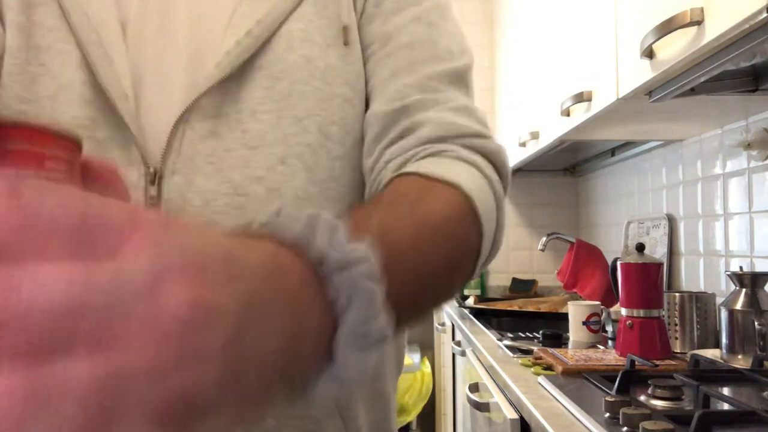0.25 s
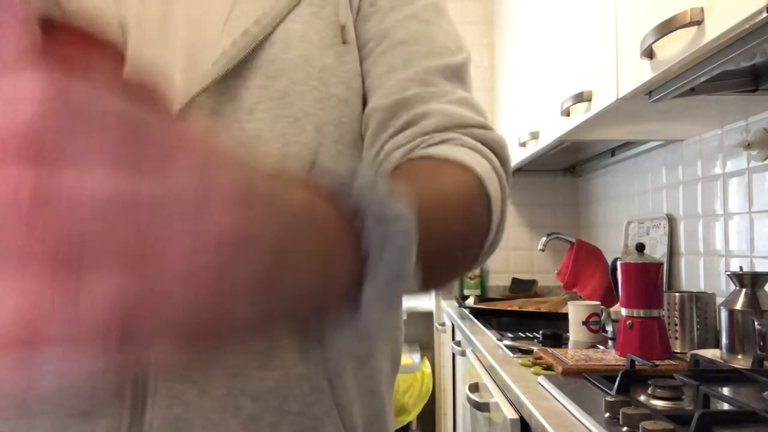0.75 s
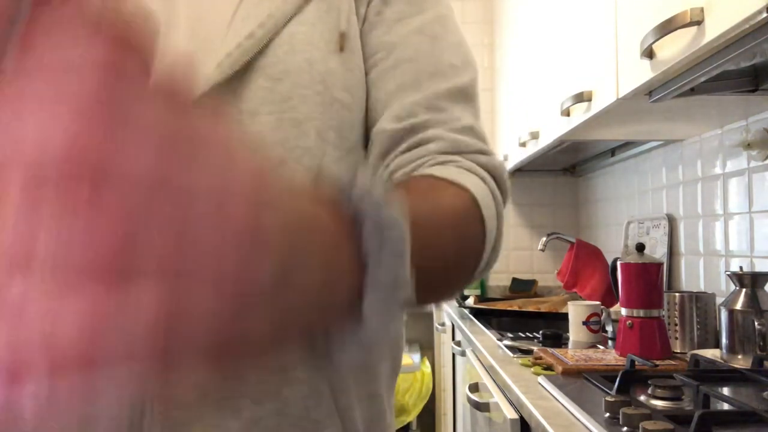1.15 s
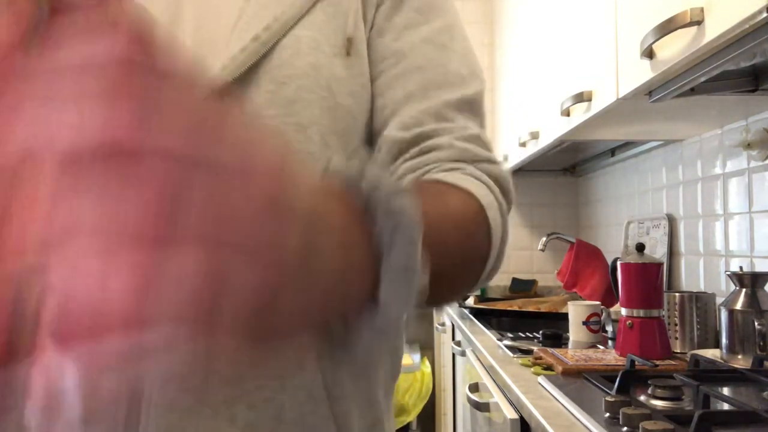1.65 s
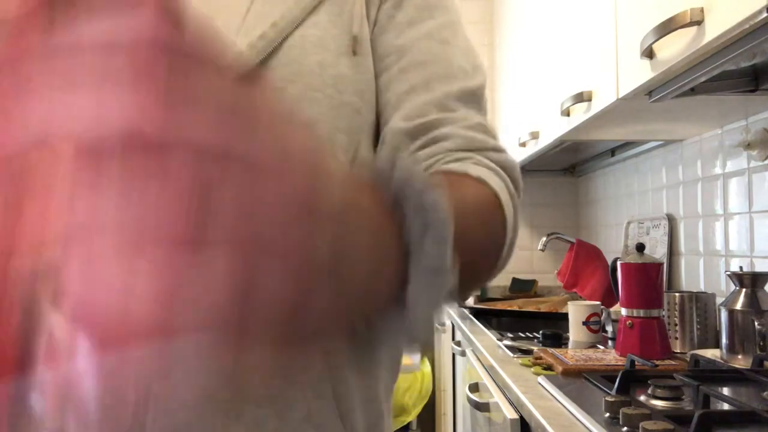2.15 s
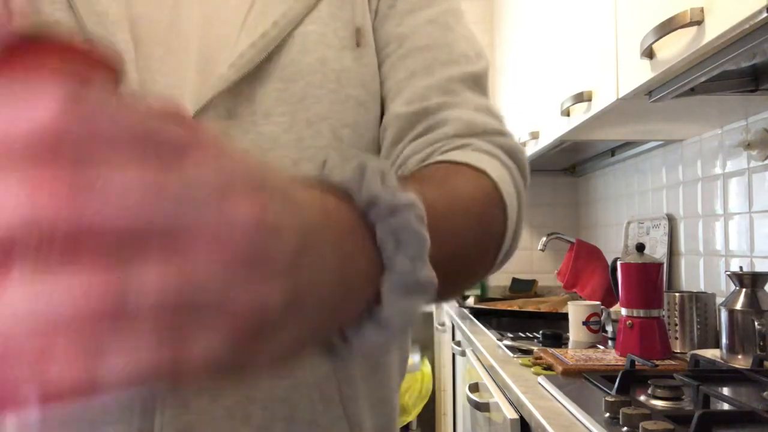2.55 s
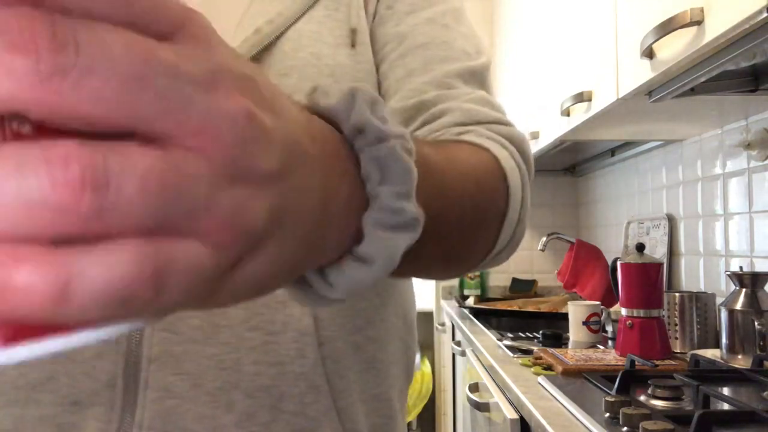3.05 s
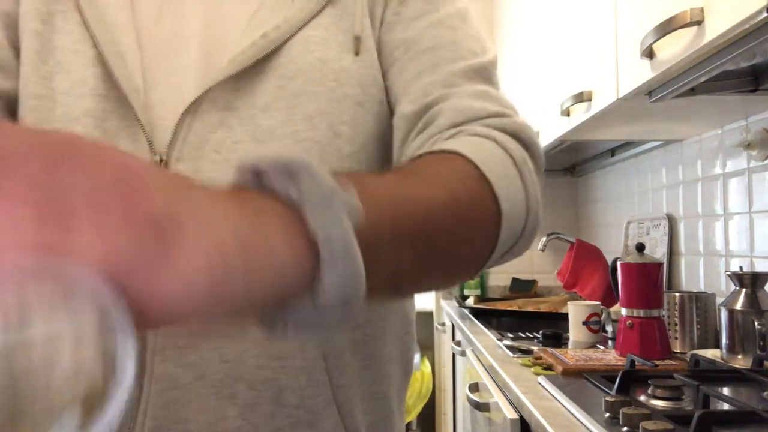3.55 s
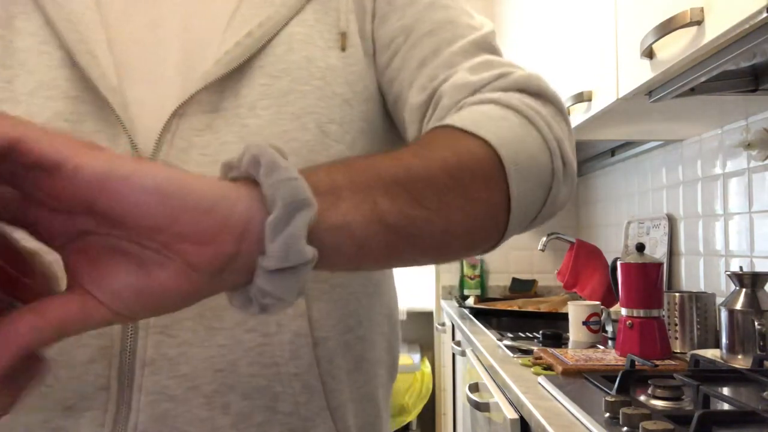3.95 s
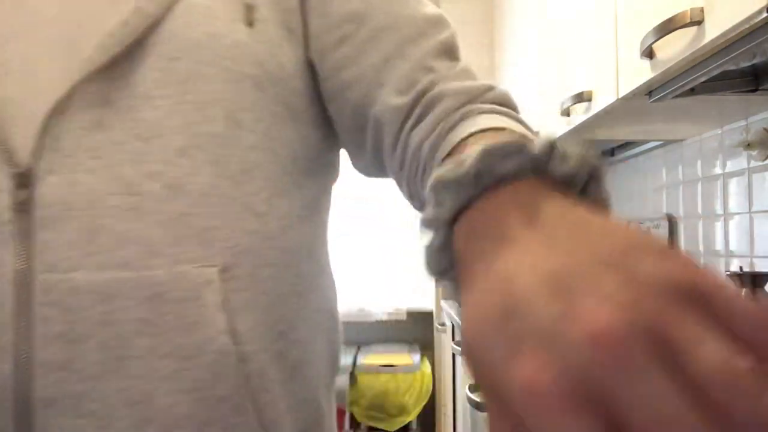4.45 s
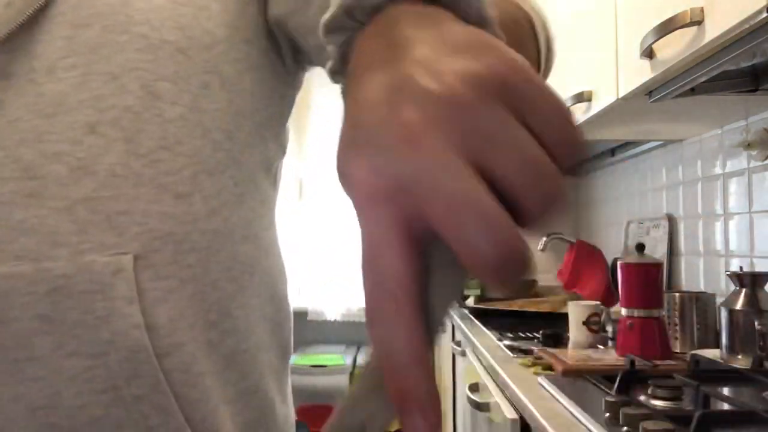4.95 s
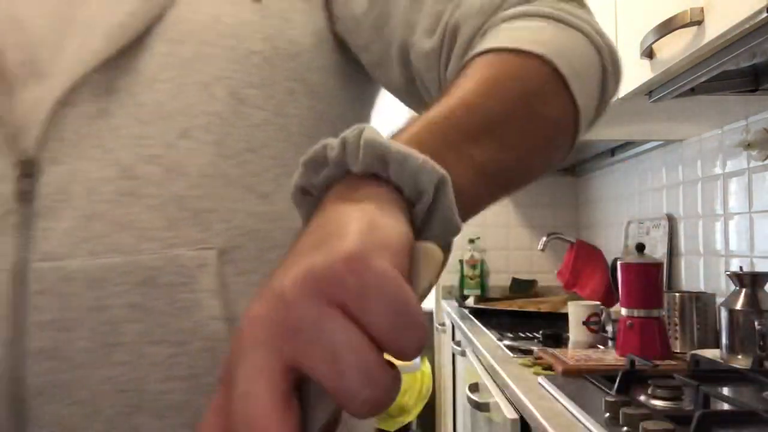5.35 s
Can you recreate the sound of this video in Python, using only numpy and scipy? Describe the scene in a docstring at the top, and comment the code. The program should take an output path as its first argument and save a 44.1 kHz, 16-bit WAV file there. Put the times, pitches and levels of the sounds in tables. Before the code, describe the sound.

Soft powdery shakes about six per second, three loud hollow slaps, a hard counter knock, then faint clicks in a tiled kitchen.

```python
"""Powder thumps and hisses in a shaken canister of grated cheese, which is then slapped three times
and stood on a kitchen counter, where it rocks to rest; small clicks, bumps and rustles follow the hand.
Each landing is a tone of falling pitch, and the sliding powder and cloth are shaped grainy noise.
Solid bodies ring as decaying modes, hard contacts are coloured noise bursts,
and dense reflections add the brief ring of a tiled kitchen over quiet room noise."""
import sys
import numpy as np
from scipy import signal
from scipy.fft import rfft, irfft
from scipy.io import wavfile
from scipy.ndimage import uniform_filter1d

SR = 44100
rng = np.random.default_rng(int(sys.argv[2]) if len(sys.argv) > 2 else 0)


def store_pcm(level_fs):
    """Save levels as 16-bit WAV."""
    pcm = np.round(np.clip(level_fs, -1, 1) * 32767).astype(np.int16)
    wavfile.write(sys.argv[1], SR, np.atleast_2d(pcm).T)


N = 246519
T = np.arange(SR // 2) / SR  # time since the start of one event, s
STROKE_S = .1636  # nominal period of one down-and-up swing of the arm


def strokes():
    """Periodic excitation: evenly spaced landings as (t/s, stroke level/dB, sliding level/dB)."""
    # bouts of even strokes, a lone jolt starting and ending at once:
    # first landing t/s, last landing t/s, sliding hiss level/dB relative to the stroke
    bouts = [(0.0282, .3225, -9), (0.6862, .6868, -15), (.8615, 2.498, -12), (3.3834, 3.3839, -13),
             (3.783, 3.782, -13.5)]
    # vigour of the shaking: t/s, stroke level/dB
    effort = [(0, -43), (.32, -47), (.86, -42.5), (1.5, -42.5), (2.0, -44), (2.17, -41), (2.33, -41),
              (2.5, -46.5), (3.8, -51)]
    rows = []
    for first, last, hiss_db in bouts:
        count = 1 + int(round(abs(last - first) / STROKE_S))
        for s in np.linspace(first, last, count):
            db = np.interp(s, *np.transpose(effort))
            rows.append((s, db, db + hiss_db))
    return rows


def thumps(rise_s=0.00141, overtone=2.592, overtone_db=-3, overtone_t60=0.0435):
    """Relaxing spring: the landed powder bounces on its own stiffness, and softening lowers its pitch."""
    plug_hz, plug_rest_hz, plug_relax_s, plug_length_s = 280, 68, .006, .035
    out = np.zeros(N)
    for s, db, _ in strokes():
        envelope = np.exp(-(T / plug_length_s) ** 4)
        plug = envelope * np.sin(sag(plug_hz, plug_rest_hz, plug_relax_s))
        packing = 1 + 0.24 * rng.standard_normal()  # each landing detunes the overtone
        upper_phase = overtone * packing * sag(223.0, 132.6, 0.00527)
        upper = np.sin(upper_phase) * fade(overtone_t60)
        onset = undb(db) * (1 - np.exp(-T / rise_s))
        add(out, s, onset * plug)
        add(out, s + 0.002152, onset * undb(overtone_db) * upper)
    return out


def sliding(lead_s=0.00769, rush_s=0.00925, back_s=0.0691, back_scatter_s=0.0067, back_width_s=0.0125,
            back_db=-11, stir_s=0.0622, stir_db=-14, hiss_db=-2.5, grain_db=2.0, clump_db=3):
    """Granular friction: clumps scrape the wall just before landing, and more softly on the return."""
    # spectrum of the scraping powder: f/Hz, relative level/dB
    powder_shape = [(300, -3), (1500, -12), (3000, -8), (5000, -7), (6300, -2.5), (7500, -1.5),
                    (8500, -13.5), (10000, -17), (15000, -30)]
    t, power = np.arange(N) / SR, np.zeros(N)
    for s, _, db in strokes():
        near = np.abs(t - s) < .5
        u = t[near] - s
        rush = np.exp(-((u + lead_s) / rush_s) ** 4)
        back_centre = back_s + back_scatter_s * rng.standard_normal()
        back = undb(back_db) * np.exp(-((u - back_centre) / back_width_s) ** 2)
        stir = undb(stir_db) * np.exp(-((u + lead_s) / stir_s) ** 2)
        power[near] += undb(db + hiss_db) ** 2 * (rush ** 2 + back ** 2 + stir ** 2)
    slow_noise = unit(uniform_filter1d(rng.standard_normal(N), size=100))
    clumps = undb(clump_db * slow_noise)
    return colour(grains(N, grain_db) * clumps * np.sqrt(power), powder_shape)


def crumbs(count=3, crumb_db=-11, spread_db=6, crumb_hz=2800, spread_octaves=2, cycles=14):
    """Random impacts: a few loose crumbs tick at random moments around each landing."""
    out = np.zeros(N)
    for s, db, _ in strokes():
        for when, size, pitch in rng.random((count, 3)) - .5:
            hz = crumb_hz * 2 ** (spread_octaves * pitch)
            tick = ring([(hz, db + crumb_db + spread_db * size, cycles / hz)])
            add(out, max(s + when * STROKE_S, 0), tick)
    return out


def slaps(tick_db=-5, blow_db=0, plug_db=-3, wet_db=-12):
    """Impulsive excitation: a tick on the rim, then the full blow rings the wall and jolts the powder."""
    # slaps on the canister: t/s, level/dB, rim level/dB, rim tilt/dB per octave,
    # low wall modes level/dB, high wall modes level/dB, lag from first touch to full blow t/s
    slap_rows = [(2.725, -17.5, 5, -0.5, 3, 4, 0.002056), (2.8946, -16.5, 0, -1.5, 5.5, -0.5, 0.0021),
                 (3.0401, -17, 2.5, -1, 2.5, 0, 0.0018)]
    # spectrum of the hand on the rim, before the tilt: f/Hz, relative level/dB
    rim_shape = [(200, -93.5), (800, 6.5), (1200, 2), (2200, -7), (4200, -2), (5500, -10), (7500, -11.5),
                 (10000, -21), (16000, -29.5)]
    # canister wall and the air inside: f/Hz, level/dB, decay t60/s
    low_modes = [(389, 1, 0.0167), (513, 2.5, 0.01896), (613.6, -0.5, 0.0205)]
    high_modes = [(1060.5, 3, 0.0129), (1228, 1, 0.0163), (1578, 3, 0.0077), (2063, -2, 0.0046),
                  (3168, -13.5, 0.011), (4550, -3.5, 0.0044)]
    out = np.zeros(N)
    for s, db, rim_db, tilt, low_db, high_db, lag in slap_rows:
        rim = tilted(rim_shape, tilt)
        slap = np.zeros(2 * len(T))
        add(slap, 0, undb(rim_db + tick_db) * colour(contact(0.02474, 0.914), rim))
        add(slap, lag, undb(rim_db + blow_db) * colour(contact(0.105, 0.131), rim))
        wall = undb(low_db) * ring(low_modes) + undb(high_db) * ring(high_modes)
        add(slap, lag, wall * (1 - np.exp(-T / 0.000147)))
        plug = np.sin(sag(237.0, 59.4, 0.0087)) * fade(0.114) * (1 - np.exp(-T / 0.00033))
        add(slap, lag + 0.004107, undb(plug_db) * plug)
        add(out, s, undb(db) * kitchen(slap, wet_db))
    return out


def setting_down(rise_s=0.00018, focus_db=9, wet_db=-7):
    """Modal excitation by contact: an edge strikes the counter, the base lands flat, then it rocks to rest."""
    # canister meeting the counter: t/s, body level/dB, most driven f/Hz,
    # crack level/dB, crack tilt/dB per octave, chatter t60/s
    knock_rows = [(4.4512, -14, 1200, -5.5, 0, 0.01088), (4.456, -12.5, 499, -29.5, -6.5, 0.024),
                  (4.465, -15, 456, -19, -8, 0.044), (4.513, -29, 1160, -22.5, -4, 0.0594),
                  (4.559, -27.5, 1150, -31, -4, 0.0325)]
    # modes of the counter with the canister on it: f/Hz, level/dB, decay t60/s
    counter_modes = [(162.24, -5.5, 0.113), (267.7, -7, 0.048), (383, -11, 0.1006), (538.8, -3.5, 0.0754),
                     (655, -1.5, 0.0254), (861, -6, 0.037), (1035, -3, 0.0218), (1090.6, -18, .15),
                     (1174.5, -1.5, 0.0284), (1307, -15.5, 0.14), (1449.3, -8, 0.068),
                     (2380.3, 2.5, 0.0372), (3674, -4.5, 0.024), (4040, -10, 0.031), (4547, 3, 0.0168)]
    # spectrum of the contact crack, before the tilt: f/Hz, relative level/dB
    crack_shape = [(200, -33.5), (1000, 2.5), (1900, -4.5), (2600, -5), (4000, 2.5), (6000, -10),
                   (7500, -3), (9000, -15), (11000, -13.5), (16000, -28)]
    out = np.zeros(N)
    for s, body_db, centre_hz, crack_db, tilt, chatter_s in knock_rows:
        # a flat landing drives the low modes, an edge the higher ones
        modes = [(hz, db - focus_db * abs(np.log2(hz / centre_hz)), t60) for hz, db, t60 in counter_modes]
        body = undb(body_db) * ring(modes) * (1 - np.exp(-T / rise_s))
        crack = undb(crack_db) * colour(contact(chatter_s, 0.707), tilted(crack_shape, tilt))
        add(out, s, kitchen(body + crack, wet_db))
    return out


def handling(cycles=16, tick_db=-3, tone_db=-5, bass_slope_db=9):
    """Damped resonance: light clicks with one short ring each, and dull bumps ringing the worktop."""
    # small things touched by the hand: t/s, level/dB, ring f/Hz, slope above the ring/dB per octave
    click_rows = [(2.104, -43.5, 1277, -7.5), (2.502, -38.5, 4340, -6), (3.555, -42, 4300, -11.5),
                  (3.765, -39.5, 3660, -13.5), (5.155, -37, 4660, -22), (5.165, -30.5, 2790, -8.5),
                  (5.186, -36, 3100, -10), (5.1954, -23.5, 1242, -16), (5.2108, -38, 5485, -29.5),
                  (5.2486, -38.5, 1019, -17.5), (5.4035, -35, 1119, -13), (5.4055, -32.5, 2040, -10.5),
                  (5.4634, -42.5, 3000, -8.5), (5.572, -44, 2585, -16.5)]
    # dull bumps on the worktop: t/s, level/dB
    bump_rows = [(3.789, -53), (4.9282, -46.5), (5.2, -39.5)]
    # modes of the worktop: f/Hz, level/dB, decay t60/s
    worktop_modes = [(180.8, -3, 0.22), (267.6, -5.5, 0.041), (391, 1, 0.082), (518.8, 0.5, 0.051)]
    out = np.zeros(N)
    for s, db, hz, slope in click_rows:
        shape = [(hz * 2 ** octave, min(bass_slope_db * octave, slope * octave))
                 for octave in np.arange(-2, 3.5, .5)]
        tick = colour(contact(0.01776, 0.704), shape)
        tone = ring([(hz, tone_db, cycles / hz)]) * (1 - np.exp(-T * hz))
        add(out, s, undb(db) * (undb(tick_db) * tick + tone))
    for s, db in bump_rows:
        add(out, s, undb(db) * ring(worktop_modes))
    return out


def rustling(trim_db=-2, wander_octaves=0.335):
    """Friction noise: the sleeve swishes in a varying colour at each stroke, and as the arm moves on."""
    # sleeve and skin brushing as the arm changes position: middle t/s, half length t/s,
    # level/dB before the common trim
    rustle_rows = [(0.262, 0.111, -61.5), (0.822, 0.0856, -63), (2.508, 0.0208, -51), (3.512, 0.092, -63),
                   (3.828, .078, -63.5), (4.824, 0.099, -64.5), (4.963, 0.058, -54)]
    # stroke swish: middle ahead of the landing, half length, level relative to the stroke, mean centre
    lead_s, half_s, sleeve_db, sleeve_hz = 0.032, .08, -25.5, 2274
    cloth_hz = 3460
    out = np.zeros(N)
    for s, db, _ in strokes():
        hz = sleeve_hz * 2 ** (wander_octaves * rng.standard_normal())
        sleeve = swish(half_s, hz, octaves=1.84, grain_db=2.5)
        add(out, max(s - lead_s - half_s, 0), undb(db + sleeve_db) * sleeve)
    for s, half_length, db in rustle_rows:
        cloth = swish(half_length, cloth_hz, octaves=1.0, grain_db=1.06)
        add(out, max(s - half_length, 0), undb(db + trim_db) * cloth)
    return out


def swish(half_s, hz, octaves, grain_db):
    """Amplitude-modulated noise: one grainy swell of rubbing cloth."""
    n = int(2 * half_s * SR)
    return np.hanning(n) * unit(band(grains(n, grain_db), hz, octaves))


def kitchen(x, wet_db, gap_s=0.0028, build_s=0.00216):
    """Diffuse reverberation: dense reflections whose bands decay apart, in a new pattern at each call."""
    # reverberation of tiles and cupboards: f/Hz, level/dB, decay t60/s
    reverb_bands = [(91.1, -11.5, 0.502), (250, 2.5, 0.369), (550, 1, 0.316), (1175, 5, 0.2965),
                    (2445, 3, 0.3484), (4500, 5.5, 0.306), (7734, -0.5, 0.265), (14170, 0.5, 0.266)]
    hz, db, t60 = np.transpose(reverb_bands)
    f = np.log(np.maximum(np.fft.rfftfreq(len(T), 1 / SR), 1))
    slowest = fade(max(t60))
    build = 1 - np.exp(-np.maximum(T - gap_s, 0) / build_s)
    arrivals = grains(len(T), 1.843) * slowest * build
    noise = rfft(even(arrivals, 70))
    tail = np.zeros(len(T))
    # the more a band is absorbed, the sooner it dies
    for d, t, share in zip(db, t60, np.eye(len(hz))):
        band_noise = irfft(noise * np.interp(f, np.log(hz), share), len(T))
        tail += undb(d) * fade(t) / slowest * band_noise
    return x + undb(wet_db) * signal.oaconvolve(x, tail)[:len(x)]


def room_air(air_db=-60):
    """Stationary random noise: a quiet, bass-heavy room background."""
    # spectrum of the background: f/Hz, relative density level/dB per Hz
    air_shape = [(25, -18), (50, -4), (85, -1), (130, -12.5), (260, -11), (450, -16.5), (800, -18.5),
                 (1500, -22.5), (2200, -29), (6500, -29.5), (13000, -42), (16000, -46.5)]
    return undb(air_db) * unit(colour(rng.standard_normal(N), air_shape))


def contact(t60, grit):
    """Impulse and chatter: a hard touch, then decaying noise, with no overall colour of its own."""
    chatter = grit * rng.standard_normal(len(T)) * fade(t60)
    chatter[0] = 2
    return np.linalg.norm(chatter) * even(chatter, 258.9)


def sag(start_hz, end_hz, relax_s):
    """Stiffness relaxation: phase/rad of a powder plug, stiff when squeezed and then softer."""
    hz = end_hz + (start_hz - end_hz) * np.exp(-T / relax_s)
    return 2 * np.pi * np.cumsum(hz) / SR


def ring(modes):
    """Modal superposition: struck modes, neighbours swinging in opposite directions."""
    return sum((-1) ** k * undb(db) * fade(t60) * np.sin(2 * np.pi * hz * T)
               for k, (hz, db, t60) in enumerate(modes))


def fade(t60):
    """Exponential decay: the level falls 60 dB in t60 seconds."""
    return np.exp(-np.log(1000) * T / t60)


def grains(n, spread_db):
    """Granular noise: dense tiny impacts of unequal size, at rms 1."""
    return unit(rng.standard_normal(n) * undb(spread_db * rng.exponential(size=n)))


def tilted(points, tilt):
    """Spectral tilt: add tilt dB per octave to a (f/Hz, level/dB) shape."""
    return [(hz, db + tilt * np.log2(hz)) for hz, db in points]


def colour(x, points, size=4096):
    """Minimum-phase filtering: a causal filter of unit energy with the given (f/Hz, level/dB) shape."""
    hz, db = np.transpose(points)
    f = np.maximum(np.fft.rfftfreq(size, 1 / SR), 1)
    gain = undb(np.interp(np.log(f), np.log(hz), db))
    cepstrum = irfft(np.log(gain))
    cepstrum[size // 2:] = 0  # keeping only the causal half gives minimum phase
    response = irfft(np.exp(2 * rfft(cepstrum)))
    return signal.oaconvolve(x, response / np.linalg.norm(response))[:len(x)]


def band(x, hz, octaves):
    """Resonant selection: a gentle band-pass around hz."""
    edges = np.clip([hz / 2 ** (octaves / 2), hz * 2 ** (octaves / 2)], 10, SR / 2 - 10)
    return signal.lfilter(*signal.butter(1, edges, "band", fs=SR), x)


def even(x, width_hz):
    """Spectral whitening: level out a noise burst, keeping detail finer than width_hz."""
    spectrum = rfft(x, 2 * len(x))
    bins = max(int(width_hz * 2 * len(x) / SR), 1)
    local_power = uniform_filter1d(np.abs(spectrum) ** 2, bins)
    return irfft(spectrum / np.sqrt(local_power + 1e-12))[:len(x)]


def undb(db):
    """Logarithmic level: decibels to amplitude gain."""
    return 10 ** (np.asarray(db) / 20)


def unit(x):
    """Power normalisation: scale by the standard deviation to 1."""
    return x / np.std(x)


def add(track, s, sound):
    """Linear superposition: mix a sound into the track from time s."""
    i = int(round(s * SR))
    track[i:i + len(sound)] += sound[:N - i]


def scene():
    """Superposition of all the handling in the kitchen over quiet room noise."""
    shaking = kitchen(thumps() + sliding() + crumbs(), wet_db=-12)
    small_things = kitchen(handling() + rustling(), wet_db=-12.0)
    return (shaking + slaps() + setting_down() + small_things + room_air())[None]


def record(dry):
    """Band limitation: a high-pass thins the deepest bass and a steep low-pass cuts the top."""
    thinned = signal.sosfilt(signal.butter(2, 42, "high", fs=SR, output="sos"), dry)
    top_hz = 15900
    return signal.sosfilt(signal.ellip(8, .2, 70, top_hz, fs=SR, output="sos"), thinned)


dry = scene()
out = record(dry)
store_pcm(out)
```